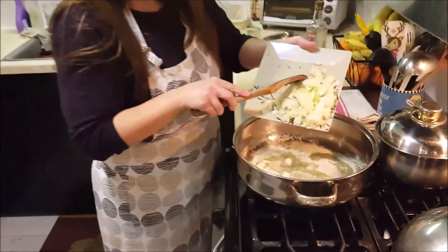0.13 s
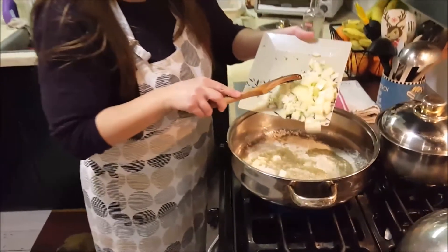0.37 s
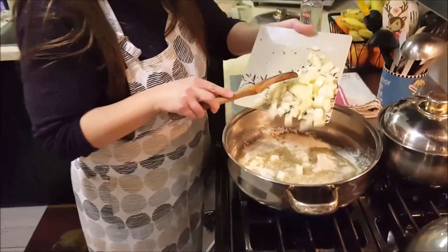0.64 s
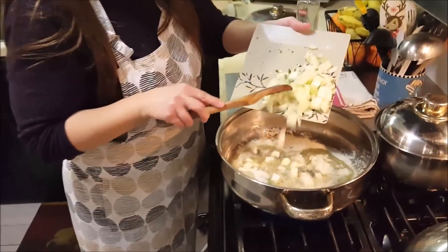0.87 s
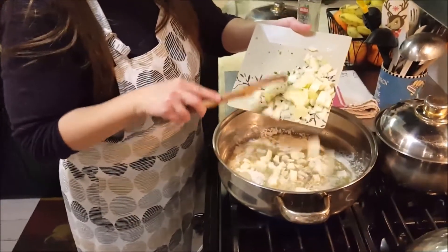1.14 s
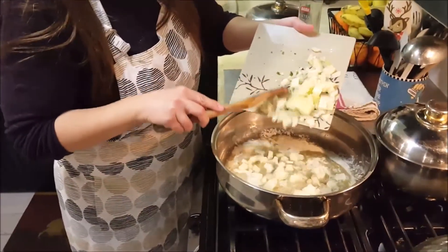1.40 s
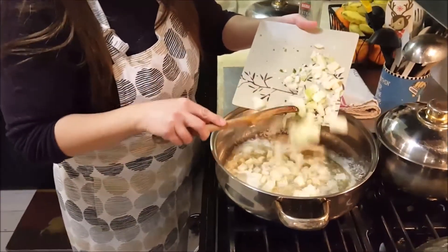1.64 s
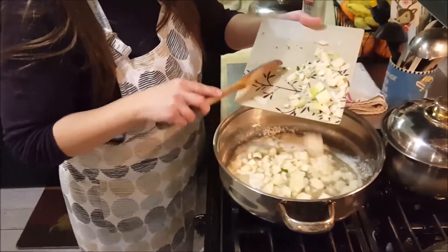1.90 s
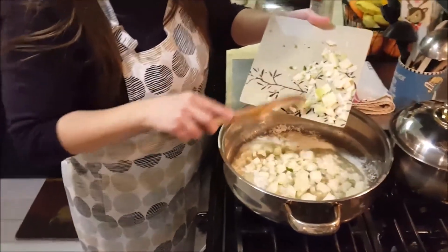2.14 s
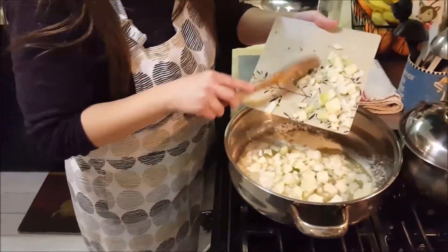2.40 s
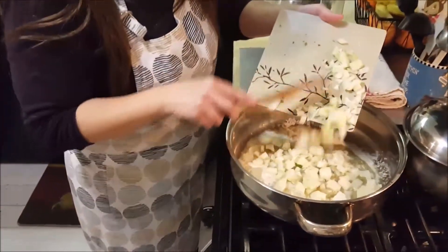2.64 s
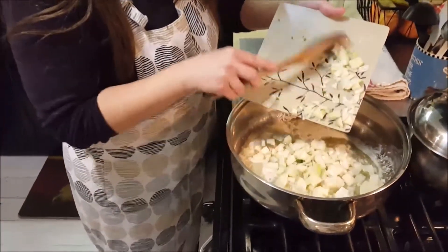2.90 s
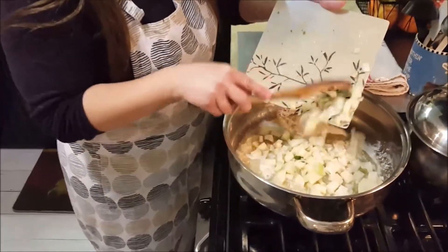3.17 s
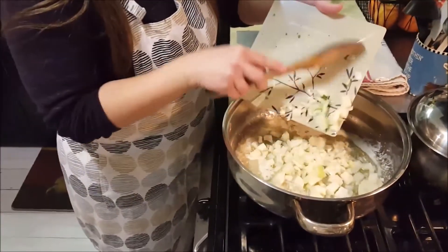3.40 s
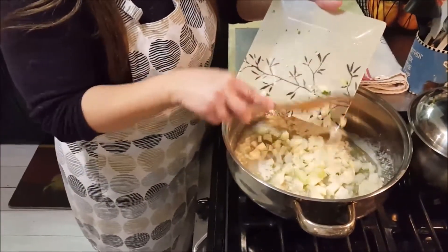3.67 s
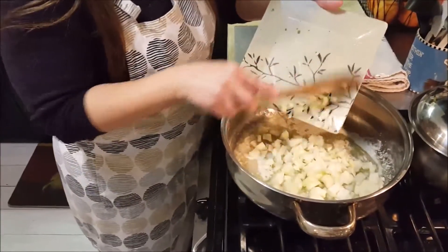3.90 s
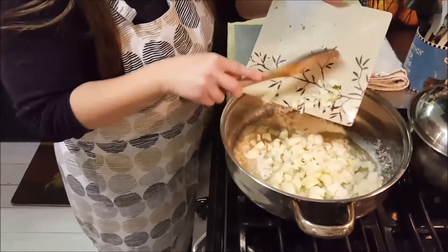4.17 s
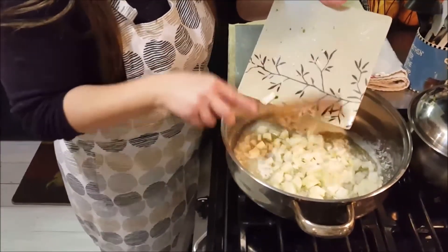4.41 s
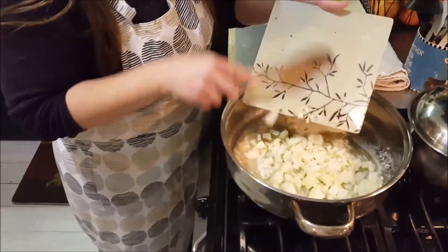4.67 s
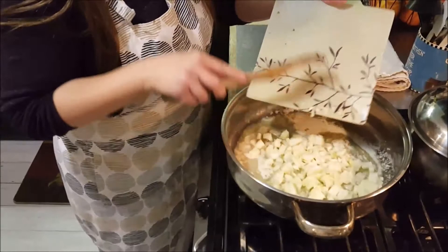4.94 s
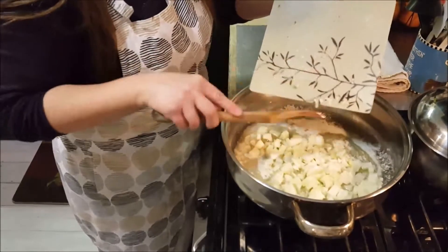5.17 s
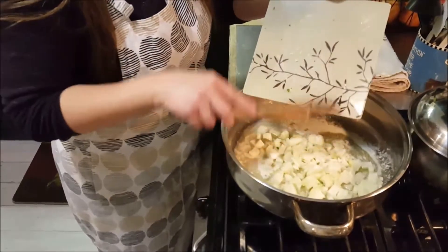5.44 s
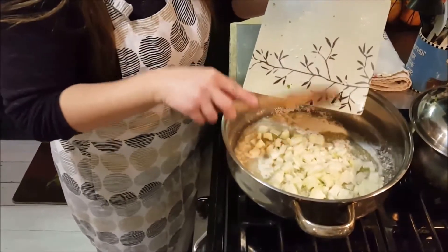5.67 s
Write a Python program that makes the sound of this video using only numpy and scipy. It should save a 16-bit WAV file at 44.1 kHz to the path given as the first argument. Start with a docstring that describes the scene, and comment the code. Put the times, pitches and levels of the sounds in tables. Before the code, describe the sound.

Wooden spoon raps on a cutting board as onion pieces patter and splat into a metal pan, sizzling brightly over faint room hum.

```python
"""Diced onion is tapped off a hard board with a wooden spoon: knocks through resonances, then board modes.
Falling pieces ring the damped modes of a steel pan and splat into hot butter as bursts of crackle.
The sizzle, noise and clicks, grows as they pile in; its fizz and steam fade as the pan cools.
A fridge hums in wavering sines under a rush of air, and the kitchen walls answer taps and drops."""
import sys
import numpy as np
from scipy import signal
from scipy.fft import rfft, irfft, next_fast_len
from scipy.io import wavfile
from scipy.ndimage import uniform_filter1d, map_coordinates

SR = 44100
rng = np.random.default_rng(int(sys.argv[2]) if len(sys.argv) > 2 else 0)


def unload_wav(signal):
    """Save mono or channel-first audio to the path in sys.argv[1] as 16-bit WAV at rate SR, clipped to [-1, 1]."""
    wavfile.write(
        sys.argv[1],
        SR,
        np.round(np.clip(np.atleast_2d(signal).T, -1, 1) * 32767).astype(np.int16),
    )


def nominal_scale(level):
    """Amplitude ratio for a level in decibels (scalar or array-like)."""
    x = np.asarray(level, float) / 20
    return 10 ** x


N = 256220


def unit(x):
    """Scales a signal to rms 1."""
    return x / np.sqrt(np.mean(x ** 2) + 1e-20)


def along(points, hz):
    """Reads a curve of (Hz, value) points on a log frequency axis."""
    point_hz, value = np.transpose(points)
    return np.interp(np.log(hz + 1), np.log(point_hz + 1), value)


def wobble(rate):
    """Draws a smooth random curve with rate knots a second."""
    knots = rng.standard_normal(int(N * rate / SR) + 4)
    return map_coordinates(knots, [np.arange(N) * rate / SR])


def filtered(x, response):
    """Filters x by a complex response of frequency."""
    n = x.shape[-1]
    m = next_fast_len(n + 8192)
    return irfft(rfft(x, m) * response(np.fft.rfftfreq(m, 1 / SR)), m)[..., :n]


def add(track, s, sound):
    """Mixes a sound in at s seconds, cut where the track ends."""
    start = round(s * SR)
    part = track[..., start:start + sound.shape[-1]]
    part += sound[..., :part.shape[-1]]


def ring(modes, colour, t, attack, free=1, rough=0):
    """Dying modes, each at a slightly random strength and weighted by the colour of the blow.

    A loose grip makes their phase drift; free below 1 shortens the ring."""
    hz, db, t60 = np.transpose(modes)[..., None]
    db = db + along(colour, hz) + 2 * rng.standard_normal(hz.shape)
    walk = np.cumsum(rng.standard_normal((len(hz), len(t))), axis=1) / np.sqrt(SR)
    drift = rough * hz / 1000 * walk
    decay = nominal_scale(db - 60 * t / (t60 * free))
    tones = decay * np.sin(2 * np.pi * hz * t + drift)
    return tones.sum(0) * (1 - np.exp(-t / attack))


def spread(pair, spectrum, alike, balance):
    """Colours two unrelated signals and mixes them to a stereo pair whose mean channel has rms 1."""
    m = next_fast_len(N)
    hz = np.fft.rfftfreq(m, 1 / SR)
    turn = np.arccos(np.clip(along(alike, hz), -1, 1)) / 2
    coloured = rfft(pair, m) * nominal_scale(along(spectrum, hz))
    mid, side = coloured * [np.cos(turn), np.sin(turn)]
    tilt = nominal_scale(np.outer([.5, -.5], along(balance, hz)))
    both = irfft(np.array([mid + side, mid - side]) * tilt, m)[:, :N]
    return both / np.sqrt(np.mean(both.mean(0) ** 2))


# How alike the two channels hear the pan. Columns: pitch_hz, likeness (-1 to 1)
PAN_LIKENESS = [(60, -0.09), (180, 0.74), (550, 0.64), (1650, -0.31), (4970, 0.35), (15000, -0.16)]
# How far the pan leans left. Columns: pitch_hz, left_minus_right_db
PAN_BALANCE = [(60, 9), (150, 8), (380, -10.5), (950, 6.5), (2380, 0), (5980, -7), (15000, -4.5)]


def from_pan(pair, spectrum):
    """Places a coloured sound across the stereo width of the pan."""
    return spread(pair, spectrum, PAN_LIKENESS, PAN_BALANCE)


def crackle(density, size_db, share, patchy_db):
    """Patchy noise with bursting bubbles on top: clicks at random moments, a few larger if size_db > 0.

    density is in clicks a second, share is the part of the power given to clicks."""
    count = int(N / SR * density.max())
    when, keep, big, *sides = rng.random((count, 5)).T
    at = (when * N).astype(int)
    size = nominal_scale(np.minimum(-size_db * np.log(1 - big), 4 * size_db))
    size = size * (keep < density[at] / density.max())  # thins the clicks out where density is low
    clicks = np.array([unit(np.bincount(at, size * (side - .5), N) / np.sqrt(density)) for side in sides])
    share = np.clip(share, 0, 1)
    both = np.sqrt(1 - share) * rng.standard_normal((2, N)) + np.sqrt(share) * clicks
    z = signal.stft(both, nperseg=512)[2]
    field = uniform_filter1d(rng.standard_normal(z.shape[1:]), size=4, axis=0)
    field = uniform_filter1d(field, size=5, axis=1)
    return signal.istft(z * nominal_scale(patchy_db * unit(field)), nperseg=512)[1][:, :N]


# Early reflections. Columns: delay_ms, left_db, right_db
WALL_ECHOES = [(3.4, -12.5, -29.5), (4.6, -11, -11), (8.5, -19, -23), (9.6, -13, -12), (13.5, -10.5, -8.5)]
# Decay time of the kitchen tail. Columns: pitch_hz, t60_s
KITCHEN_DECAY = [(200, 0.35), (700, 0.33), (2000, 0.35), (5000, 0.33), (12000, 0.07)]
# Part of scatter and tail that differs between the ears. Columns: pitch_hz, level_db
TAIL_WIDTH = [(150, -43), (320, -21), (600, -1), (1500, -2.5), (4000, -2)]


def room(sound, near_db, tail_db):
    """Direct sound, near walls, a quick scatter off pots and worktop, and a new diffuse tail.

    The tail dies band by band, each at its own rate."""
    length, scatter_t60, onset_s = SR // 3, 0.028, 0.00085
    hz, t, z = signal.stft(rng.standard_normal((2, 2, length)), SR, nperseg=256)
    z[:, 1] *= nominal_scale(along(TAIL_WIDTH, hz))[:, None]
    z[0] *= nominal_scale(-60 * t / scatter_t60)
    z[1] *= nominal_scale(-60 * t / along(KITCHEN_DECAY, hz)[:, None])
    onset = 1 - np.exp(-np.arange(length) / SR / onset_s)
    near, far = signal.istft(z, SR, nperseg=256)[1][..., :length] * onset
    near = nominal_scale(near_db) * near / np.linalg.norm(near[0])
    far = nominal_scale(tail_db) * far / np.linalg.norm(far[0])
    common, own = near + far
    answer = np.array([common + own, common - own])
    answer[:, 0] = 1  # direct sound
    for ms, left_db, right_db in WALL_ECHOES:
        answer[:, round(ms * SR / 1000)] += nominal_scale(np.array([left_db, right_db]))
    return signal.fftconvolve(sound[None], answer, axes=1)


# Burner and kitchen air, relative spectrum. Columns: pitch_hz, level_db (per Hz)
AIR_SPECTRUM = [(36, -29), (62, -1.5), (103, -9.5), (230, -3.5), (309, -9.5), (408, -6.5), (589, -10.5),
                (707, -12), (998, -16), (1810, -25.5), (3010, -27), (3610, -31), (8260, -36), (9920, -46.5),
                (15000, -37.5)]
# Fridge tones before their fade. Columns: pitch_hz, level_db (rms), waver_db
FRIDGE_HUM = [(54.5, -59, 2.1), (121.8, -68, 0.5), (155.7, -68.5, -4)]


def kitchen():
    """A slowly fading fridge hum of wavering sines over the soft noise of burner and room."""
    air_db, hum_fade_db_per_s = -57.5, 0.87
    t = np.arange(N) / SR
    hum = np.zeros(N)
    for hz, db, waver_db in FRIDGE_HUM:
        level = np.sqrt(2) * nominal_scale(db + waver_db * wobble(4.31))
        hum += level * np.sin(2 * np.pi * (hz * t + 0.15 * wobble(6.4)))
    alike = [(60, 1.0), (400, 0.91), (1500, 0.18), (4000, 0.13)]  # pitch_hz, likeness
    air = spread(rng.standard_normal((2, N)), AIR_SPECTRUM, alike, [(100, 0)])
    return nominal_scale(-hum_fade_db_per_s * t) * hum + nominal_scale(air_db + 0.33 * wobble(4.13)) * air


# The pan sings faintly under the bubbling. Columns: pitch_hz, width_hz, boost_db
PAN_SINGING = [(1058, 86, 14), (1812, 57, 5.5), (2340, 27, 10.5), (2820, 46, 9), (3640, 55, 6)]


def sung(x):
    """The pan's resonances lift narrow bands of what boils in it."""
    def boost(hz):
        return nominal_scale(sum(db / (1 + (2 * (hz - c) / width) ** 2) for c, width, db in PAN_SINGING))
    return filtered(x, boost)


# Sizzle levels over time, before the random surges. Columns: time_s, fizz_db, steam_db
SIZZLE_LEVELS = [(0.0, -67.5, -91), (0.13, -71, -89), (0.29, -76, -90), (0.55, -76, -88), (0.9, -70, -85),
                 (1.05, -68, -67), (1.58, -65.5, -72), (1.89, -61, -63), (2.26, -55.5, -58.5),
                 (2.52, -54.5, -58), (3.2, -54.5, -61.5), (3.9, -55, -63), (4.16, -56.5, -66),
                 (4.68, -56, -67.5), (5.34, -57.5, -71), (5.81, -62.5, -78)]
# Relative spectra of the three layers. Columns of each: pitch_hz, level_db (per Hz)
FIZZ_SPECTRUM = [(1760, -30), (3000, -3.5), (3340, -7), (3720, -3.5), (4340, -9), (4920, -7), (5700, -4),
                 (6500, 1), (7350, -5), (8580, 1), (9300, -5.5), (10000, -10), (11000, -13.5),
                 (12500, -17.5), (16200, -50)]
STEAM_SPECTRUM = [(10000, -13), (11500, -12), (13000, -6), (14100, -3.5), (15000, -14), (15900, -4)]
BUBBLING_SPECTRUM = [(530, -6), (900, -23), (969, -10.5), (1050, -9), (1800, -0.5), (2100, -2.5),
                     (3700, -4), (4500, -1), (6500, -5), (9900, -53)]


def sizzle():
    """Water boils out of the onion as fizz, steam and bubbling: a louder fizz brings denser clicks."""
    heap_full_s, full_db = 2.41, -60.5
    rise_db_per_s, late_db_per_s = 7.5, 0.62  # bubbling grows as the heap does, then creeps
    s, *levels = np.transpose(SIZZLE_LEVELS)
    t = np.arange(N) / SR
    fizz_db, steam_db = [np.interp(t, s, db) for db in levels]
    since = t - heap_full_s
    bubbling_db = full_db + np.where(since < 0, rise_db_per_s, late_db_per_s) * since
    density = 4000 * nominal_scale(0.63 * (fizz_db - fizz_db.max()))
    surge = 0.3 * wobble(30) + 1.1 * wobble(7.3)

    fizz = from_pan(crackle(density, size_db=4.0, share=0.34, patchy_db=1.5), FIZZ_SPECTRUM)
    fizz = nominal_scale(fizz_db + surge) * fizz
    steam = from_pan(crackle(density, size_db=0.0, share=0.3, patchy_db=2.0), STEAM_SPECTRUM)
    steam = nominal_scale(steam_db + surge + 0.66 * wobble(22)) * steam
    bubbling = from_pan(crackle(density / 8, size_db=0.0, share=0.2, patchy_db=2), BUBBLING_SPECTRUM)
    bubbling = nominal_scale(bubbling_db + wobble(18)) * bubbling
    return fizz + steam + sung(bubbling)


def shower(count, db, scatter_db, low_db, high_db):
    """Rows (start_s, level_db, low_db, high_db) for small pieces raining down at random in the pour."""
    pour_start_s, pour_end_s = 0.76, 2.0
    when = rng.uniform(pour_start_s, pour_end_s, count)
    size, low, high = scatter_db * rng.uniform(-1, 1, (3, count))
    return np.transpose([when, db + size, low_db + 2 * low, high_db + 2 * high])


# The loudest wet splats and spits of fat, and the hiss of a spoon scrape at 3.80 s; low is below 5 kHz, top
# above 10 kHz, both relative. # Columns: start_s, level_db, low_db, top_db, t60_s
LOUD_BURSTS = [(0.206, -61.5, -17, -16, 0.24), (0.2834, -63, -9, -12, 0.098),
               (0.595, -46.5, -7, -11, 0.083), (0.6294, -63, -5, -11, 0.096), (0.8564, -63, -17, 1, 0.18),
               (0.9223, -60, -14, -2, 0.082), (0.9845, -46, -8, 3, 0.024), (1.0365, -49.5, -19, -20, 0.032),
               (1.2082, -50, -10, -5, 0.048), (1.2523, -50, -21, 0, 0.041), (1.296, -53, -10, -3, 0.056),
               (1.3169, -50, -14, -9, 0.079), (1.4905, -59.5, 3, -8, 0.16), (1.6795, -52.5, -3, -1, 0.043),
               (1.712, -43.5, -5, -7, 0.033), (1.8094, -56, -2.5, -8, 0.083), (1.8474, -60.5, 10, 2, 0.047),
               (1.9467, -46.5, -18, -16, 0.037), (2.0494, -52, -1.5, -10, 0.088),
               (2.993, -41.5, -21, -47, 0.065), (3.8034, -39.5, -3, -26, 0.094),
               (3.8294, -54.5, 1.5, -18, 0.3), (4.5915, -47, -5, -19, 0.055),
               (4.7686, -60, -15, -20, 0.032), (5.1894, -48, -8, -18, 0.037)]
# Relative spectra of the low, middle and top band. Columns of each: pitch_hz, level_db (per Hz)
SPLAT_SPECTRA = [
    [(1500, -18), (2800, 4), (4500, 0), (6000, -25)],
    [(4000, -6), (5500, 0), (8500, 3.5), (10500, -11)],
    [(9000, -23), (10500, -2), (14000, -5), (16000, -8)],
]


def splats():
    """Wet pieces hit the fat and a spoon scrape hisses at 3.80 s: sharp bursts of crackle in three bands that
    die quickly."""
    small = shower(22, db=-66, scatter_db=3, low_db=3, high_db=-12)
    small_t60 = 0.06
    rows = np.array([*LOUD_BURSTS, *[(*row, small_t60) for row in small]])
    start_s, level_db, low_db, top_db, t60 = rows.T
    t = np.arange(SR // 4) / SR
    shapes = nominal_scale(-60 * t / np.maximum(t60[:, None], .005)) * (1 - np.exp(-t / 0.0026))
    out = np.zeros((2, N))
    for spectrum, shade_db in zip(SPLAT_SPECTRA, [low_db, 0, top_db]):
        bursts = np.zeros(N)
        for s, db, shape in zip(start_s, level_db + shade_db, shapes):
            add(bursts, s, nominal_scale(db) * shape)
        fat = crackle(np.full(N, 5000.), size_db=3.0, share=0.36, patchy_db=5.5)
        out += bursts * from_pan(fat, spectrum)
    return out


# The loudest pieces landing on the pan floor, levels relative.
# Columns: start_s, level_db, deep_db, bright_db
LOUD_DROPS = [(0.213, -41, -20, -9), (0.6, -38, -11.5, -5), (0.811, -57, -5, 6), (0.856, -36.5, -24, -9),
              (0.899, -49, -15, -9), (0.984, -56.5, -3.5, 8.5), (1.037, -44, -18, 0),
              (1.107, -48, -13, -11), (1.145, -50.5, -12, 0), (1.293, -49, -7.5, -3),
              (1.324, -56.5, 7.5, -3), (1.497, -52.5, -6, -1), (1.71, -49, -16, -1.5), (1.762, -50, -4, -3),
              (1.821, -47, -9, 0), (1.839, -54, 12, 3.5), (1.879, -60, 14, -12), (2.935, -58, -20, -17),
              (3.299, -59, 5.5, 13), (3.35, -55, -8, 5.5)]
# Pan modes; the decay is that of a free pan. Columns: pitch_hz, level_db, t60_s
PAN_MODES = [(234.3, 3, 0.31), (383, 0.5, 0.15), (504.4, -5.5, 0.68), (514, 0, 0.11), (634, -3, 0.13),
             (808, -13, 0.47), (965, -1, 0.075), (1046, 1.5, 0.088), (1093, -6, 0.25), (1490, -11, 0.029),
             (3120, -7.5, 0.044)]


def drops():
    """Soft pieces thump the pan floor; each blow's colour weights its modes, and the heap damps them."""
    free_start, free_loss_per_s = 0.73, 0.076  # how freely the pan rings, 0-1, as the heap grows
    out, t = np.zeros((2, N)), np.arange(SR // 3) / SR
    patter = shower(12, db=-57.5, scatter_db=0, low_db=-1.5, high_db=-0.5)
    for s, db, deep_db, bright_db in [*LOUD_DROPS, *patter]:
        free = np.clip(free_start - free_loss_per_s * s, .1, 1)
        colour = [(240, deep_db), (500, 0), (1050, bright_db)]
        blow = ring(PAN_MODES, colour, t, attack=0.0017, free=free, rough=5.3)
        add(out, s, nominal_scale(db - 5.0) * room(blow, near_db=-2.0, tail_db=-12))
    return out


# Resonances of the spoon head. Columns: pitch_hz, width_hz, level_db
SPOON_RESONANCES = [(229, 620, -15), (502, 186, 0), (610, 107, -1), (1030, 277, 11), (2030, 190, -0.5),
                    (2500, 330, -4.5), (3620, 280, -8), (4140, 330, -10.5), (6900, 2400, -17.5)]


def knock_response(hz, colour):
    """Resonances of alternating sign; wood on board is too soft to excite much above the contact pitch."""
    contact_hz = 3470
    wood = 0
    for k, (c, width, db) in enumerate(SPOON_RESONANCES):
        resonance = 1j * hz * width / (c * c - hz * hz + 1j * hz * width)
        wood = wood + (-1) ** k * nominal_scale(db + along(colour, c)) * resonance
    return wood / (1 + 1j * hz / contact_hz) ** 3


# Spoon on board, levels relative. Columns: start_s, level_db, thud_db, crack_db_per_octave,
# ring_db, ring_tilt_db_per_octave
SPOON_TAPS = [(0.141, -30.5, -6, -18, -24.5, -9), (2.008, -45, 15, -4, -18.5, 3.5),
              (2.412, -22.5, -4.5, -5, -28.5, -4), (2.899, -45.5, 26, -9, -25, -4),
              (3.469, -20.5, 4.5, -1, -26.5, 2), (3.808, -42, 11, 4, -17.5, 3),
              (3.9, -24, 10.5, 2.5, -27.5, 1.5), (4.293, -17.5, -5, 4, -23.5, -2),
              (4.667, -15.5, 0.5, 5, -27.5, 6), (5.13, -15, -2.5, 5.5, -22.5, 0.5),
              (5.435, -16.5, -3, 3.5, -24, -6), (5.752, -21.5, 5, 6, -26, 1.5)]
# Modes of the board. Columns: pitch_hz, level_db, t60_s
BOARD_MODES = [(625, -1.5, 0.37), (657.7, 13, 0.056), (770, -7.5, 0.54), (865, -27, 0.1), (1003, 3.5, 0.21),
               (1030, -13.5, 0.73), (1100, -34, 0.18), (1160, -12, 0.16), (1220, -18, .15),
               (1540, -17, 0.085), (1644, -0.5, 0.19), (1823, 5.5, 0.099), (1780, -12, 0.27),
               (2180, -8, 0.18), (2193, -2.5, 0.15), (2400, -10, 0.18), (2564, -2.5, 0.14),
               (3410, -8, 0.047), (3580, -4.5, 0.048), (4130, -3.5, 0.045), (4600, -7, 0.042)]


def taps():
    """A short wooden knock that fills the kitchen, and the modes of the board ringing close by."""
    thud_hz, body_hz = 500, 650  # the thud shades what lies under the first, nothing over the second
    pivot_hz = 1050  # crack and ring tilt turn about this
    out, t = np.zeros((2, N)), np.arange(SR // 2) / SR
    click = 1. * (t == 0)
    for s, db, thud_db, crack_db, ring_db, tilt_db in SPOON_TAPS:
        colour = [(thud_hz, thud_db), (body_hz, 0), (pivot_hz, 0), (8 * pivot_hz, 3 * crack_db)]
        tone = [(pivot_hz / 2, ring_db - tilt_db), (4 * pivot_hz, ring_db + 2 * tilt_db)]
        knock = nominal_scale(28.0) * filtered(click, lambda hz: knock_response(hz, colour))
        board = ring(BOARD_MODES, tone, t, attack=0.00073, rough=5.7)
        add(out, s, nominal_scale(db - 4) * room(knock, near_db=-0.5, tail_db=-8.0))
        add(out, s, nominal_scale(db) * room(board, near_db=-15, tail_db=-6.0))
    return out


def scene():
    """Everything in the kitchen."""
    return kitchen() + sizzle() + splats() + drops() + taps()


def top_cut(x):
    """Nothing passes above the cut-off."""
    return signal.sosfilt(signal.butter(12, 15970, fs=SR, output="sos"), x)


def record(dry):
    """The pan stands to the right, so the left channel lags a little; the extreme treble is cut."""
    left_lag_s, top_hz = 4 / SR, 15850

    def lag_and_cut(hz):
        return (hz < top_hz) * np.exp(-2j * np.pi * np.outer([left_lag_s, 0], hz))
    return top_cut(filtered(dry, lag_and_cut))


dry = scene()
out = record(dry)
unload_wav(out)
```